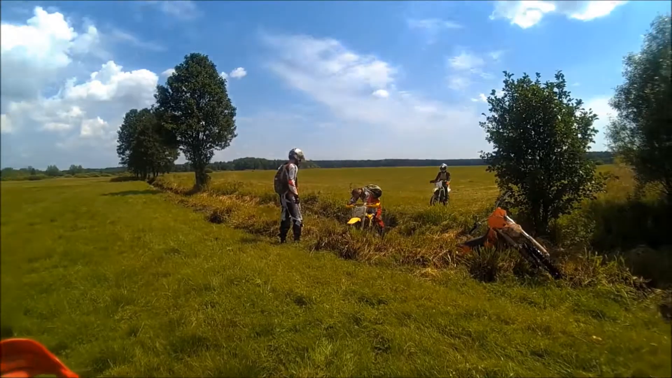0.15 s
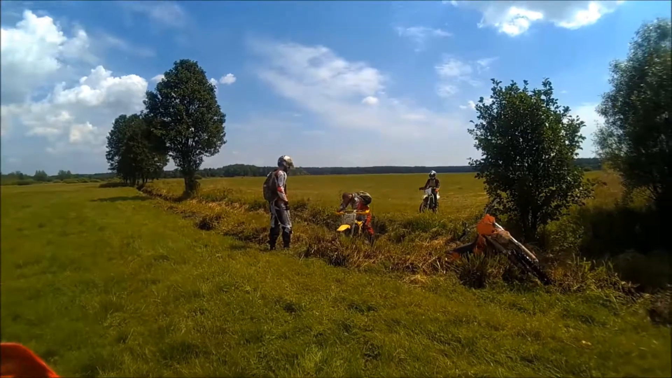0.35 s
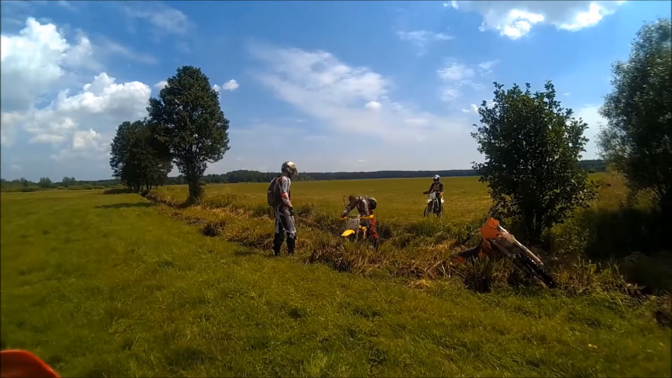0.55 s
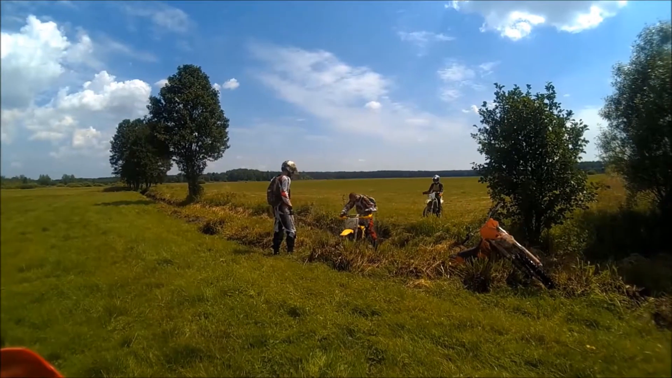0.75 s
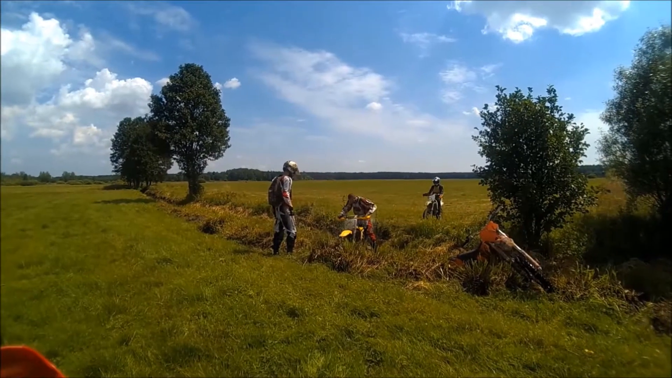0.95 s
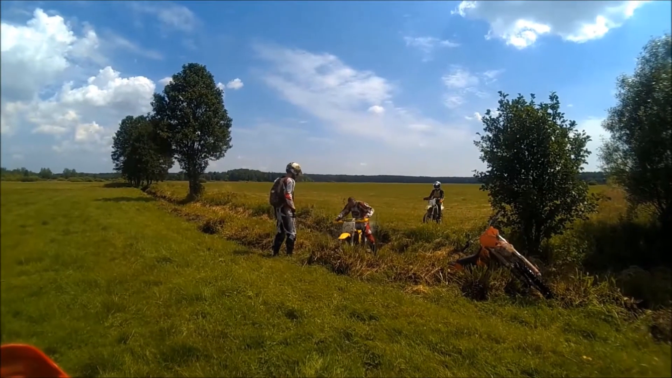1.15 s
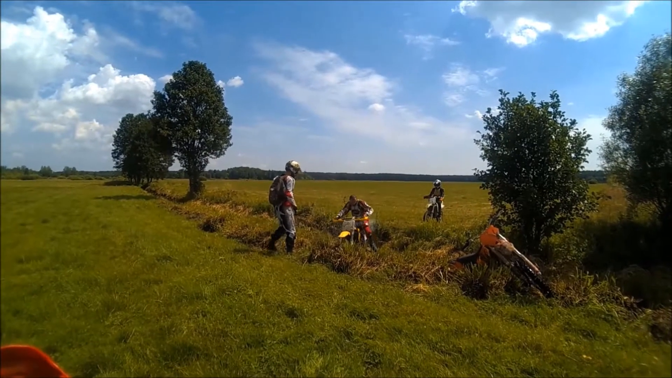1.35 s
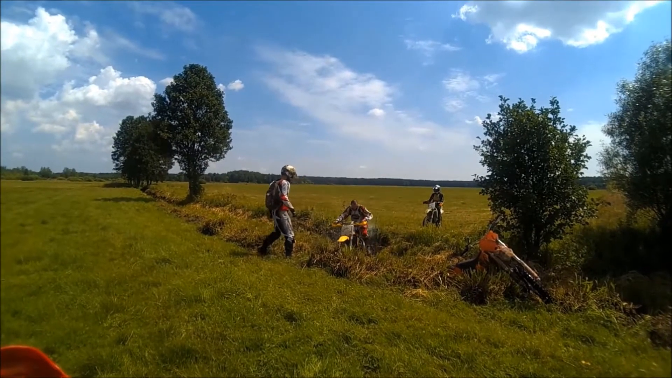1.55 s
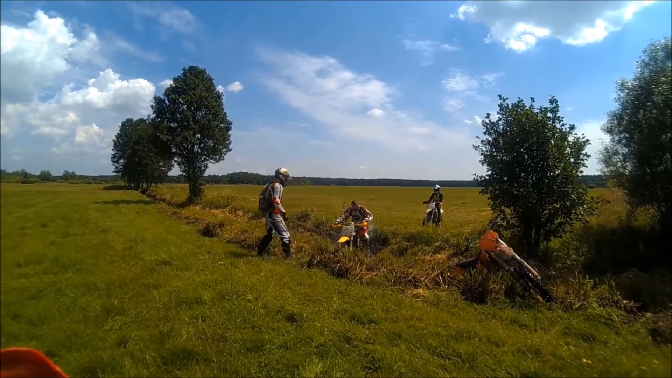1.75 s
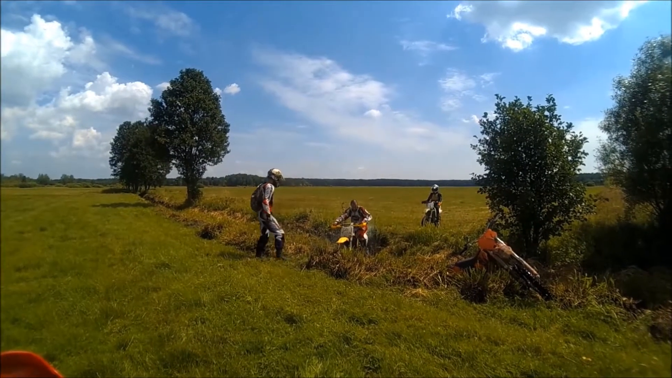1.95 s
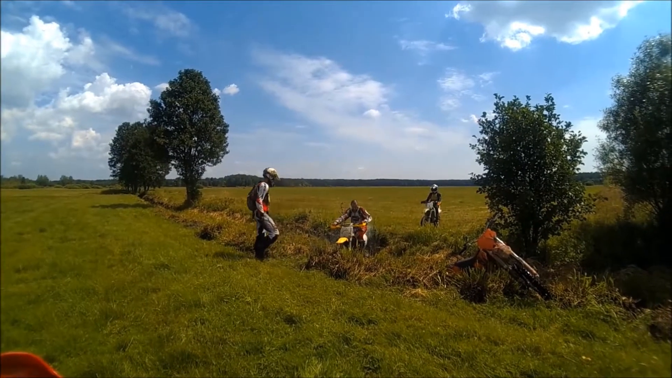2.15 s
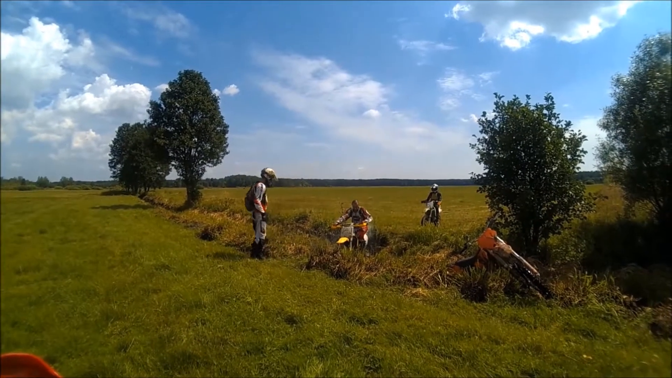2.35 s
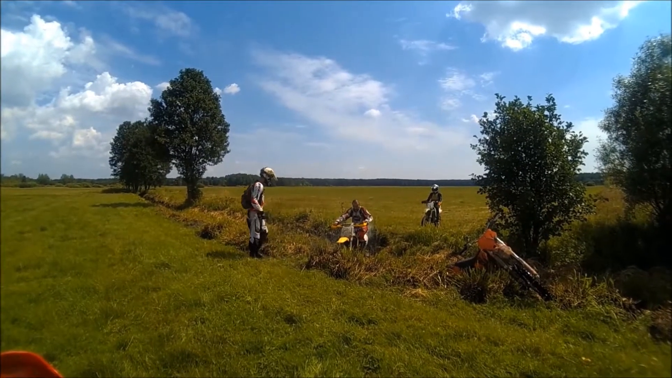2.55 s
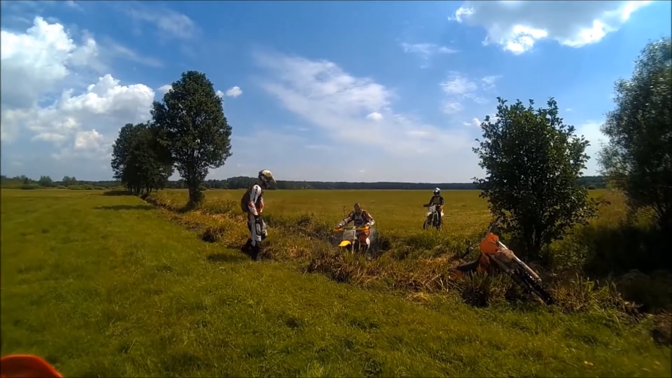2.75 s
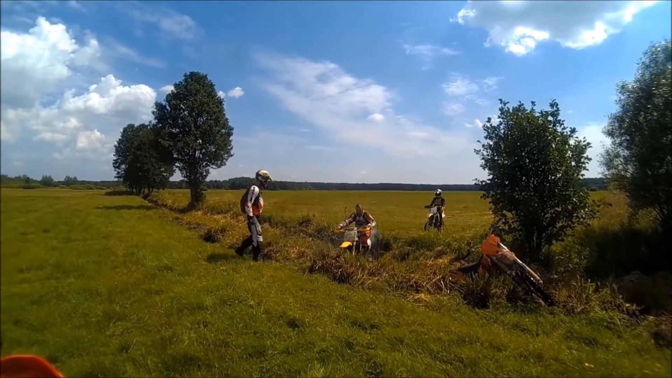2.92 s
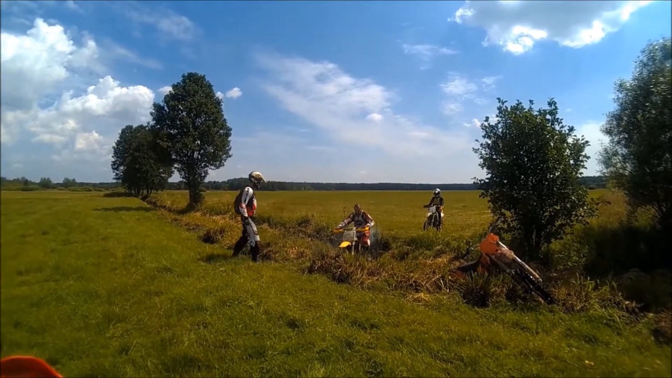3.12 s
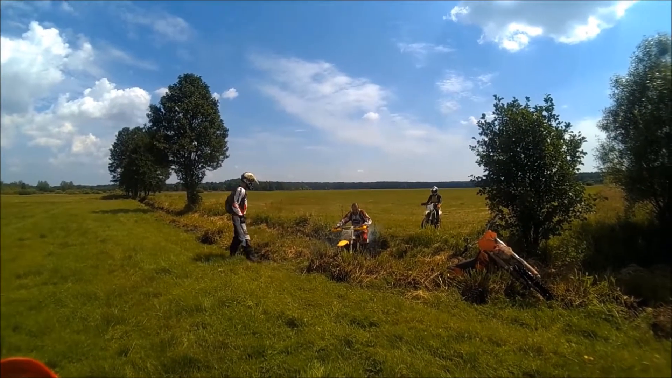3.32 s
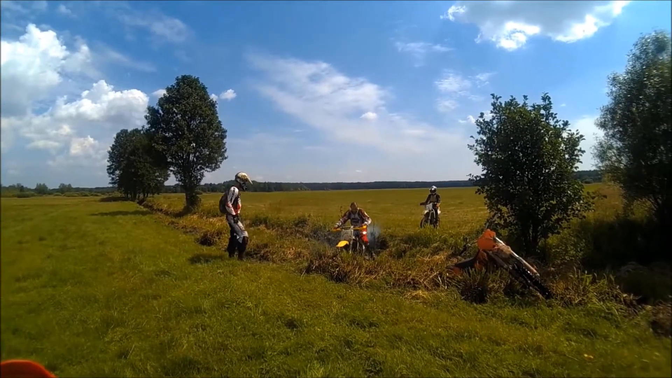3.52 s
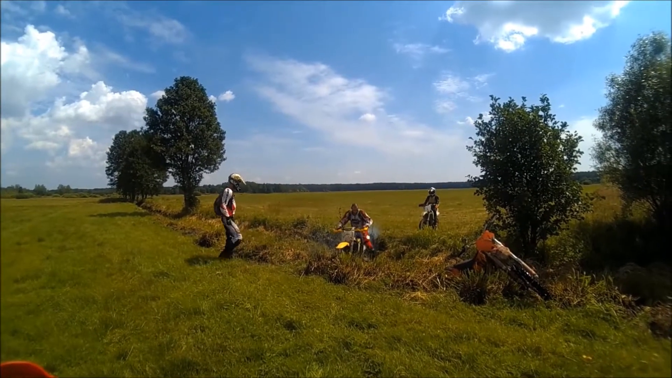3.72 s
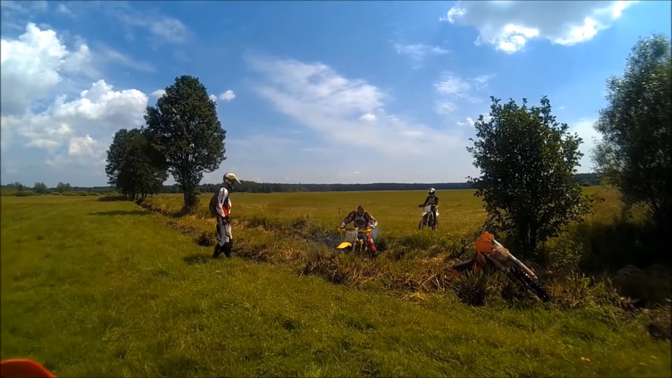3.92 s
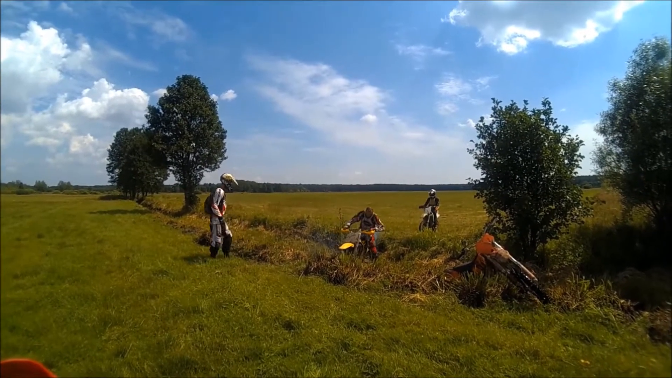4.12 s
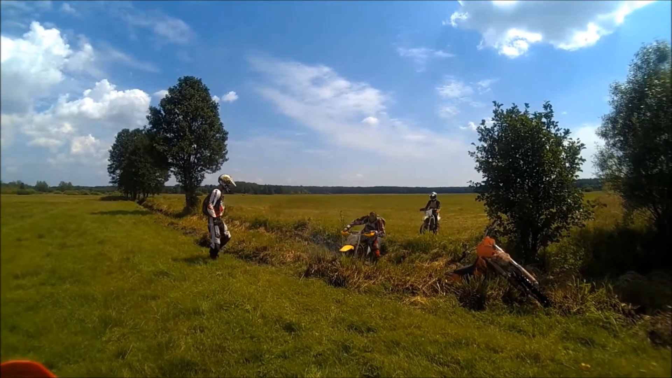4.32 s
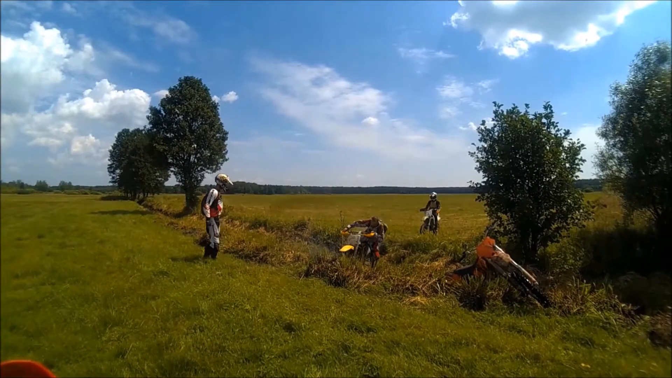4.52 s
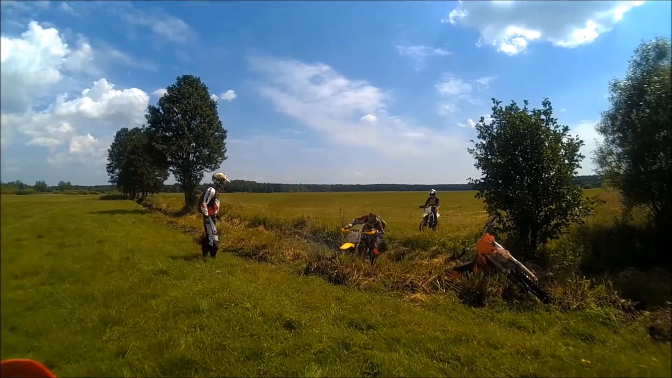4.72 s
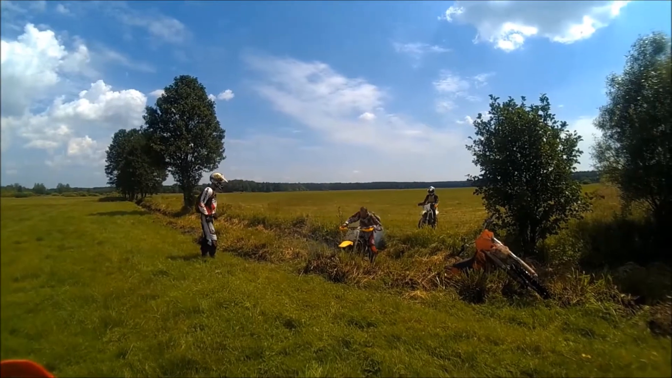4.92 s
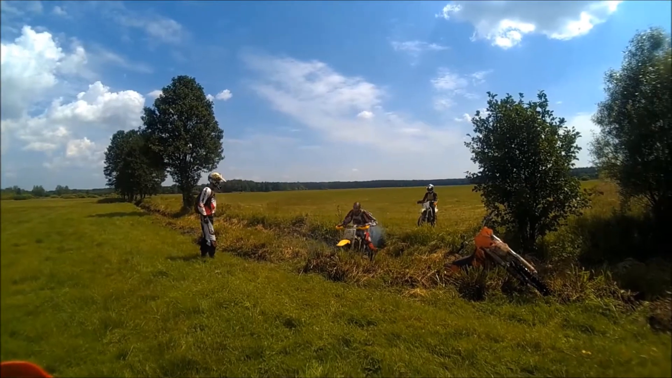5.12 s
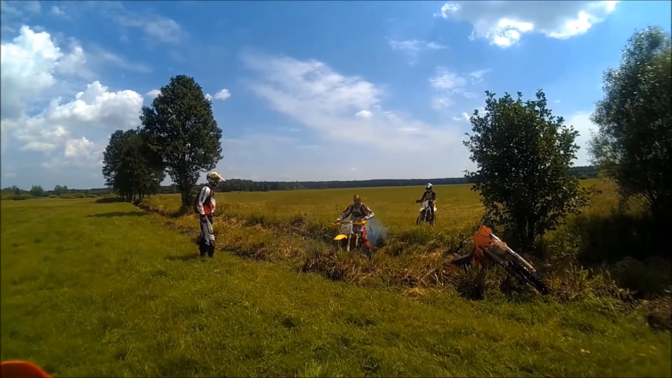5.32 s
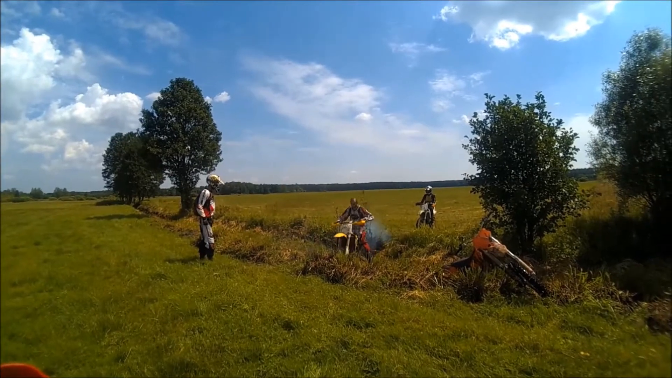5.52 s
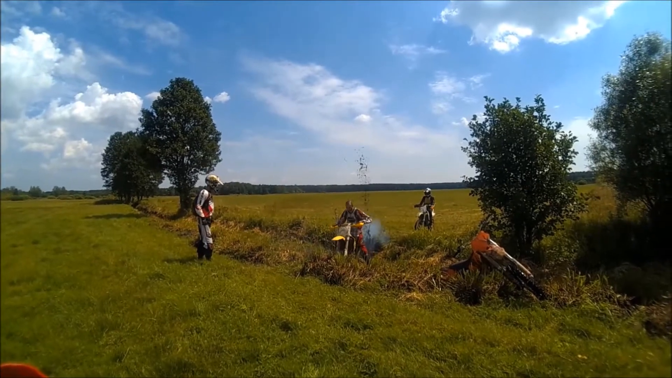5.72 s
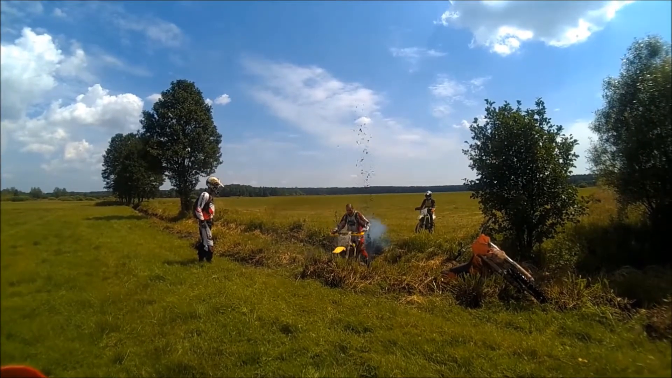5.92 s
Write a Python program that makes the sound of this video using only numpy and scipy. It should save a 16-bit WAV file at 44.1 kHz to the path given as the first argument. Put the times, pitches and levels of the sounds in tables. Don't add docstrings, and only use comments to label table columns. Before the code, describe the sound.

Out in an open meadow, a far-off dirt bike revs in nasal, rattling bursts and finally howls with wheelspin before coasting down.

```python
import sys
import numpy as np
from scipy import signal
from scipy.fft import rfft, irfft
from scipy.io import wavfile
from scipy.ndimage import uniform_filter1d, map_coordinates

SR = 44100
rng = np.random.default_rng(int(sys.argv[2]) if len(sys.argv) > 2 else 0)


def put_to_file(sound):
    columns = np.atleast_2d(sound).T
    safe = np.clip(columns, -1, 1)
    whole_steps = np.round(safe * 32767)
    wavfile.write(sys.argv[1], SR, whole_steps.astype(np.int16))


def boost_factor(decibels):
    exponent = np.asarray(decibels, float) / 20
    return 10 ** exponent


N = 267642

# [t/s, peak level/dB, gas level re ring/dB, ring f/Hz]
HARD_FIRINGS = [(.028, -40, -15, 1296), (0.343, -34, -11, 1140), (0.386, -32.5, -9, 1090),
                (.445, -32.5, -11, 1253), (0.53, -41, -6, 1330), (.995, -41.5, 0, 1175),
                (1.037, -32.5, -17, 1167), (1.095, -30.5, -7.5, 1244), (1.116, -34.5, -14, 1175),
                (1.152, -39, -12, 1250), (1.77, -34.5, -8.5, 1262), (1.83, -34.5, -6, 1250),
                (2.371, -39.5, 0, 1325), (2.413, -35, -11, 1250), (2.65, -33.5, -9, 1245),
                (2.685, -34.5, -17.5, 1216), (2.736, -34.5, -16, 1280), (2.964, -39.5, -1.5, 1200),
                (3.168, -38.5, -16, 1120), (3.243, -35.5, 0, 1250), (3.296, -34.5, 1, 1180),
                (3.764, -34.5, -3.5, 1130), (3.988, -34.5, -2.5, 1330), (4.017, -32, -11, 1127),
                (4.659, -34.5, -8, 1165), (4.718, -42.5, -3, 1190), (5.027, -44, -8.5, 1157),
                (5.088, -28, -9.5, 1310), (5.129, -24, -18, 1307), (5.425, -23.5, -21, 1270)]
IDLE_TURNS = 39
BLUR_HZ = 1600


def evened(x):
    return x / np.sqrt(np.mean(x ** 2) + 1e-20)


def spectrum_at(points, hz):
    f, level_db = np.transpose(points)
    return np.interp(np.log(hz + 1), np.log(f + 1), level_db)


def band(x, lo_hz, hi_hz):
    return signal.sosfilt(signal.butter(2, [lo_hz, hi_hz], "band", fs=SR, output="sos"), x)


def coloured(points):
    gain = boost_factor(spectrum_at(points, np.fft.rfftfreq(N, 1 / SR)))
    return evened(irfft(rfft(rng.standard_normal(N)) * gain, N))


def whistle(hz, width_hz):
    lowpass = signal.butter(2, width_hz / 2, fs=SR, output="sos")
    a, b = signal.sosfilt(lowpass, rng.standard_normal((2, N)))
    return evened(((a + 1j * b) * np.exp(2j * np.pi * np.cumsum(hz) / SR)).real)


def wander(count, per_s):
    knots = rng.standard_normal((count, 400))
    places = np.meshgrid(np.arange(count), np.arange(N) / SR * per_s, indexing="ij")
    return map_coordinates(knots, places, order=1)


def outside(start, end):
    t = np.arange(N) / SR
    return np.maximum(start - t, 0), np.maximum(t - end, 0)


def hiss():
    # [f/Hz, level/dB per Hz]
    hiss_spectrum = [(5000, -32), (5600, -14.5), (6000, -26.5), (6500, -8), (7300, -12.5), (8000, -19),
                     (8500, -8), (10000, -2), (12500, 1), (14300, -1.5), (15500, -10)]
    return boost_factor(-84.5) * coloured(hiss_spectrum)


def whine():
    whine_tone = 14373, 89.3, -87
    carrier_hz, wobble_hz, level_db = whine_tone
    t = np.arange(N) / SR
    carrier, wobble = 2 * np.pi * carrier_hz * t, 2 * np.pi * wobble_hz * t
    bend = 1.1 * np.sin(wobble) - .45 * np.sin(2 * wobble + .1)
    return np.sqrt(2) * boost_factor(level_db) * np.sin(carrier + bend)


def buzzes():
    # [t/s, peak level/dB, length/s]
    short_buzzes = [(0.0373, -77, 0.023), (0.3202, -81, 0.03), (0.621, -81, 0.03), (1.0211, -78.5, 0.028),
                    (1.3538, -82, 0.03), (1.6277, -79.5, 0.03), (2.0113, -79, 0.027), (2.3545, -83, 0.03),
                    (2.6219, -82, 0.03), (3.0135, -82, 0.03), (3.3483, -85, 0.028), (4.1844, -82, 0.035),
                    (4.356, -80.5, 0.028), (4.6239, -81.5, 0.03), (5.017, -81.5, 0.03),
                    (5.224, -78.5, 0.03), (5.7997, -82, 0.03), (6.0357, -80, 0.03)]
    # [t/s, peak level/dB, length/s]
    long_buzzes = [
        (3.625, -78, .215),
        (4.012, -78, .11),
        (4.13, -73, .036),
    ]
    t = np.arange(N) / SR
    tick = np.floor(t * 146 * 2)
    clicks = np.diff(tick, prepend=0) * (1 + .5 * np.cos(np.pi * tick))
    clicks = clicks + .03 * rng.standard_normal(N)
    gate = np.zeros(N)
    for events in (short_buzzes, long_buzzes):
        for s, db, length in events:
            gate += boost_factor(db - 5) * (t > s) * (t < s + length)
    return gate * evened(band(clicks, 10000, 10800))


def rumble():
    # [f/Hz, level/dB per Hz]
    rumble_spectrum = [(26, -32.5), (45, -5), (81, -5), (134, -7), (402, -14.5), (600, -6.5), (780, -43),
                       (1320, -120)]
    return boost_factor(-77.5) * coloured(rumble_spectrum)


def wind():
    # [t/s, level/dB]
    gusts = [(.03, -62), (.22, -61.5), (.45, -70), (.9, -77), (1.099, -68.5), (1.21, -67), (1.46, -66),
             (1.64, -62.5), (2.2, -67), (2.47, -64), (2.67, -64.5), (2.83, -62.5), (3.93, -66),
             (4.169, -73), (4.77, -64), (5.629, -64.5), (6.0, -72)]
    calm_db, gust_s = -73, .032
    t = np.arange(N) / SR
    level = boost_factor(calm_db) + sum(boost_factor(db) * np.exp(-.5 * ((t - s) / gust_s) ** 2) for s, db in gusts)
    edges_hz = 30.5, 41.5
    return level * evened(band(band(rng.standard_normal(N), *edges_hz), *edges_hz))


def meadow(x):
    wet_db, t60_s, first_s = -12, .2, .006
    t = np.arange(SR // 2) / SR
    echoes = rng.choice([-1., 1.], len(t)) * (rng.random(len(t)) < .05)
    tail = echoes * boost_factor(-60 * t / t60_s) * (t > first_s)
    return x + boost_factor(wet_db) * signal.fftconvolve(x, tail / np.linalg.norm(tail))[:N]


def causal(db):
    log_gain = np.log(boost_factor(np.maximum(db, -110)))
    full = np.r_[log_gain, log_gain[-2:0:-1]]
    taps = np.fft.ifft(np.exp(np.conj(signal.hilbert(full)))).real[:len(db) // 2]
    return taps / np.linalg.norm(taps)


def case_colour():
    # [f/Hz, level/dB]
    broad_colour = [(150, -69), (250, -34), (400, -32), (600, -27.5), (900, -19.5), (1250, -12),
                    (1470, -15.5), (2500, -17.5), (3100, -21), (3800, -35.5), (4800, -43.5), (5500, -60),
                    (6000, -94), (6500, -70.5), (8000, -94.5)]
    # [f/Hz, width/Hz, level/dB]
    case_modes = [(486, 46, -27.5), (769, 98, -21), (1013, 130, -12.5), (1130, 54, 0), (1190, 103, 0.5),
                  (1250, 60, 0.5), (1290, 80, 0.5), (1571, 35, -12), (1773, 21, -11), (2053, 210, -14),
                  (2310, 50, -17), (2731, 39, -13.5), (3000, 200, -16.5), (3564, 59, -26),
                  (4480, 48, -35.5), (7010, 310, -61), (9600, 470, -73.5), (11500, 4900, -69)]
    hz = np.fft.rfftfreq(8192, 1 / SR)
    power = boost_factor(spectrum_at(broad_colour, hz) - 2) ** 2
    for f, width, db in case_modes:
        power += (boost_factor(db) / (1 + (2 * (hz - f) / width) ** 2)) ** 2
    return causal(10 * np.log10(power))


def scrape():
    # [start t/s, end t/s, level/dB]
    scrapes = [
        (0, 0.264, -54.5),
        (3.04, 3.07, -53),
        (4.588, 4.62, -54.5),
    ]
    start_hz, sag_hz_per_s, width_hz = 1410, 230, 240
    rise_db_per_s, fall_db_per_s = 188, 251
    out = np.zeros(N)
    for start, end, db in scrapes:
        early, late = outside(start, end)
        lasted = np.minimum(outside(start, start)[1], .5)
        level_db = db - rise_db_per_s * early - fall_db_per_s * late
        out += boost_factor(level_db) * whistle(start_hz - sag_hz_per_s * lasted, width_hz)
    return out


def pops():
    ring_rise_s, gas_rise_s, lead_s = .0021, .005, .001
    gas, ring, push = np.zeros((3, N))
    t = np.arange(1500) / SR
    ring_swell = t / ring_rise_s * np.exp(1 - t / ring_rise_s)
    gas_swell = t / gas_rise_s * np.exp(1 - t / gas_rise_s)
    for s, db, gas_db, hz in HARD_FIRINGS:
        at = round((s - lead_s) * SR)
        ring[at:at + len(t)] += boost_factor(db) * ring_swell * np.sin(2 * np.pi * hz * t)
        gas[at:at + len(t)] += boost_factor(db + gas_db + 6) * gas_swell * rng.standard_normal(len(t))
        push[at] = boost_factor(db - 30) * 100
    return band(gas, 1500, 11000), ring, band(push, 90, 330)


def crank():
    # [start t/s, top t/s, top speed/turns per s, sag/turns per s each s]
    spin_ups = [(-.1, 0, 53.4, 46), (.34, .46, 60.1, 43), (1.0, 1.1, 60.7, 45), (1.75, 1.87, 60, 44),
                (2.36, 2.45, 57.5, 38), (2.64, 2.75, 64, 49), (3.12, 3.3, 102.5, 80), (3.75, 3.8, 72, 85),
                (3.97, 4.1, 78.6, 73), (4.47, 4.5, 51.5, 25), (4.65, 4.76, 81.5, 77),
                (5.0, 5.12, 109.3, 610)]
    # [t/s, speed/turns per s]
    long_pull = [
        (5.19, 66.6),
        (5.26, 79.7),
        (5.32, 101.4),
        (5.4, 105),
        (5.5, 111.3),
        (5.71, 108.6),
        (5.77, 102.5),
        (5.88, 81.5),
        (6.07, 65.4),
    ]
    t, hz = np.arange(N) / SR, np.full(N, float(IDLE_TURNS))
    for start, top, top_hz, sag in spin_ups:
        before = np.interp(start, t, hz)
        gain = np.sin(np.pi / 2 * np.clip((t - start) / (top - start), 0, 1))
        now = before + (top_hz - before) * gain - sag * np.maximum(t - top, 0)
        hz = np.where(t >= start, np.maximum(now, IDLE_TURNS), hz)
    return np.where(t >= long_pull[0][0], np.interp(t, *np.transpose(long_pull)), hz)


def load(hz):
    # [open t/s, shut t/s, extra exhaust level/dB, boom level/dB, extra brightness/dB]
    twist_events = [(0, 0.243, -3.5, -79, 1), (.35, 0.417, 1, -63.5, 0), (1.007, 1.06, 2.5, -63.5, -1),
                    (1.588, 1.708, 4, -72, 0), (1.762, 1.81, 4.5, -61, -1), (2.36, 2.42, 3.5, -64, -3),
                    (2.654, 2.697, 3.5, -60.5, -2), (2.964, 2.98, 2.5, -73, -1), (3.1, 3.11, 0, -64, -1.5),
                    (3.191, 3.26, 3.5, -60.5, -2), (3.707, 3.752, 0.5, -61.5, 0.5),
                    (4.008, 4.063, 4.5, -63.5, -1.5), (4.42, 4.452, 1.5, -77, -1.5),
                    (4.677, 4.721, 4.5, -59.5, -2), (5.046, 5.17, 3.5, -58, 0), (5.188, 5.36, 6, -60, 0),
                    (5.403, 5.477, 6, -60.5, -3), (5.51, 5.75, 3.5, -60, 0)]
    open_s, shut_s = .03, .058
    boom_lead_s = .025
    t, faster = np.arange(N) / SR, hz - IDLE_TURNS
    twists, booms = [], []
    for start, end, _, boom_db, _ in twist_events:
        early, late = outside(start, end)
        twists.append(np.clip(1 - early / open_s - late / shut_s, 0, 1))
        early, late = outside(start - boom_lead_s, end - boom_lead_s)
        booms.append(boom_db - 119.5 * early - 168.5 * late)
    twists = np.array(twists)
    opening = twists.max(0)
    extra_db, _, sharp_db = np.transpose(twist_events)[2:]
    weak = sum((t > s - .022) & (t < s) for s, *_ in HARD_FIRINGS) > 0
    level_db = -57 + .2318 * faster + extra_db @ twists - 2 * uniform_filter1d(1. * weak, size=90)
    boom_db = np.maximum(np.max(booms, 0), -82 + .14 * faster)
    coasting_s = t - np.maximum.accumulate(t * (opening > .5))
    rasp = .2 + .45 * coasting_s + .6 * opening - .008 * faster * (.2 + .8 * opening)
    rasp += .55 * np.maximum(t - 5.35, 0) * opening
    return level_db, 4.5 + sharp_db @ twists, boom_db, np.clip(rasp, .05, .95)


def brighten(x, db):
    high = signal.sosfilt(signal.butter(2, 1600, "high", fs=SR, output="sos"), x)
    return x + (boost_factor(db) - 1) * high


def rattle(hz, turns):
    # [multiple of crank speed, extra level/dB]
    strong_orders = [(3, -5), (4, -7), (5, 1), (6, -5), (7, 1), (8, -2), (9, 0), (10, 0), (14, 3), (21, 4),
                     (42, 5)]
    pipe_hz, pipe_width_hz, pipe_db = 790, 120, 6
    order, phase = np.arange(3, 45)[:, None], rng.random((42, 1))
    extra = dict(strong_orders)
    extra_db = np.array([extra.get(k, -1) for k in order[:, 0]])[:, None]
    pipe_gain_db = pipe_db / (1 + (2 * (order * hz - pipe_hz) / pipe_width_hz) ** 4)
    extra_db = extra_db + (extra_db > 0) * pipe_gain_db
    height = boost_factor(extra_db + 3 * wander(count=42, per_s=9))
    height = height / np.sqrt(1 + (order * hz / BLUR_HZ) ** 4)
    waves = height * np.sin(2 * np.pi * (order * turns + phase))
    return np.sqrt(4 * hz / SR) * waves.sum(0)


def port_gas(turns, strength):
    puff_turns, steady = .6, 1.2
    puffs = steady + np.exp(-(turns % 1) / puff_turns)
    return evened(puffs * strength * rng.standard_normal(N))


def gear_mesh(hz):
    # [multiple of crank speed, width/Hz, level/dB]
    gear_lines = [
        (21.13, 85, -0.5),
        (41.96, 90, 2),
    ]
    return sum(boost_factor(db - 21.5) * whistle(k * hz, width_hz) for k, width_hz, db in gear_lines)


def intake_boom(hz, turns, strength, level_db, boom_db):
    # [multiple of crank speed, level/dB]
    boom_orders = [(1, 4), (2, 4.5), (3, -8.5), (4, -11)]
    orders = sum(boost_factor(db) * np.sin(2 * np.pi * k * turns + k * k) for k, db in boom_orders)
    lumps = evened(band(strength * rng.standard_normal(N), 130, 230))
    firing = np.clip((hz - 58) / 25, 0, 1) * np.clip((level_db + 54.5) / 10, .35, 1)
    return boost_factor(boom_db) * (firing * evened(orders) + .3 * lumps)


def engine():
    hz = crank()
    level_db, bright_db, boom_db, rasp = load(hz)
    turns = np.cumsum(hz) / SR
    uneven = uniform_filter1d(rng.standard_normal(1000)[turns.astype(int)], size=200)
    strength = boost_factor(1.5 * uneven)
    gas = port_gas(turns, strength)
    low_gas = signal.sosfiltfilt(signal.butter(2, BLUR_HZ, fs=SR, output="sos"), gas)
    drive = np.sqrt(1 - rasp) * rattle(hz, turns) + gas - (1 - np.sqrt(rasp)) * low_gas
    exhaust = brighten(boost_factor(level_db + 6.5) * (drive + gear_mesh(hz)), bright_db)
    return exhaust, intake_boom(hz, turns, strength, level_db, boom_db)


def scene():
    exhaust, boom = engine()
    gas, ring, push = pops()
    heard = signal.fftconvolve(exhaust + gas, case_colour())[:N] + ring + scrape()
    return (meadow(heard) + boom + push + wind() + rumble())[None]


def roll_off(x):
    return signal.sosfilt(signal.butter(12, 15750, fs=SR, output="sos"), x)


def record(dry):
    mix = dry + hiss() + whine() + buzzes()
    return roll_off(mix)


dry = scene()
out = record(dry)
put_to_file(out)
```